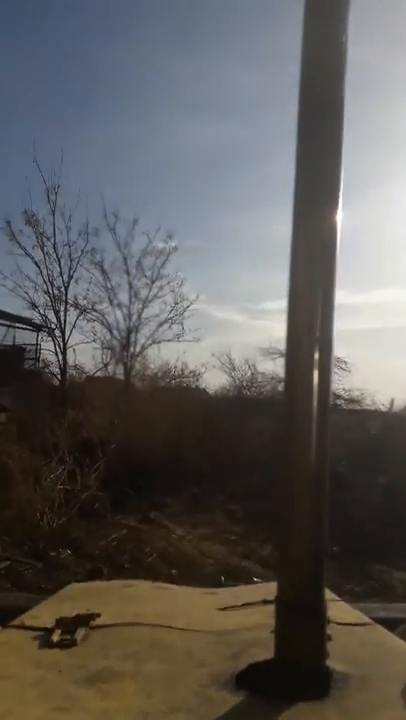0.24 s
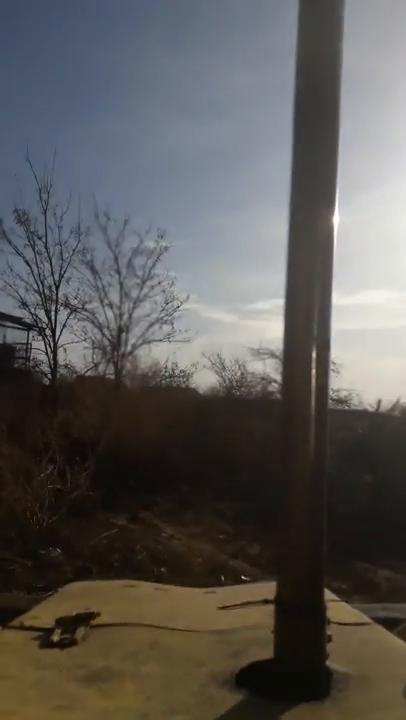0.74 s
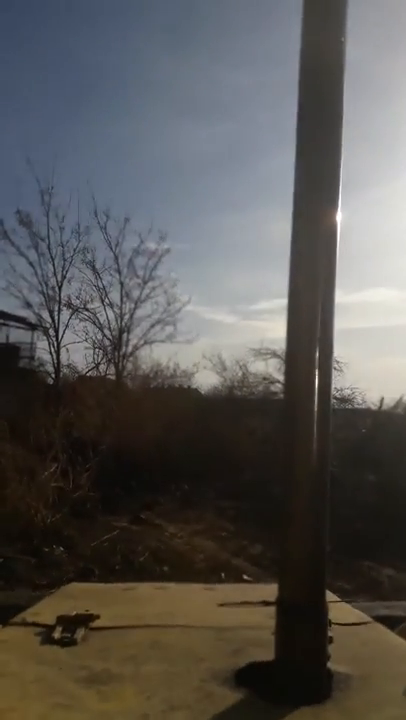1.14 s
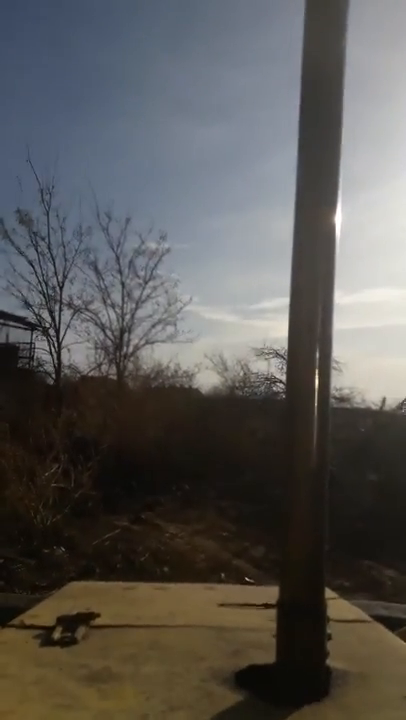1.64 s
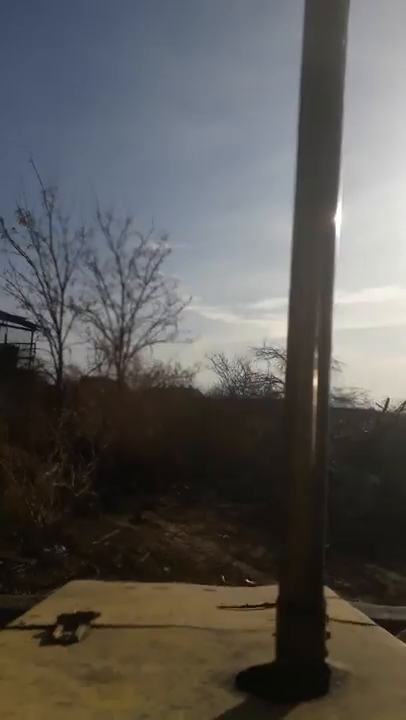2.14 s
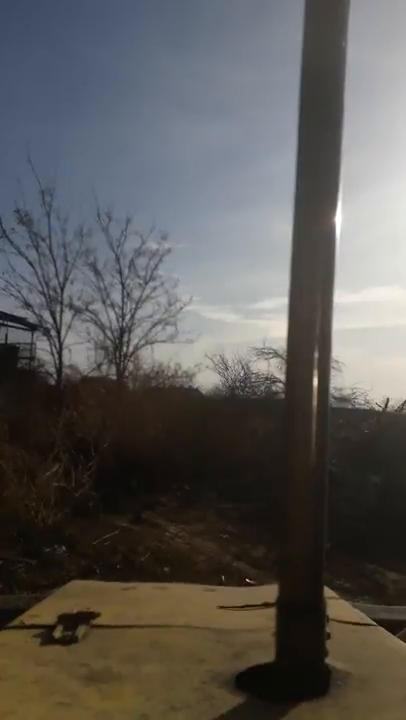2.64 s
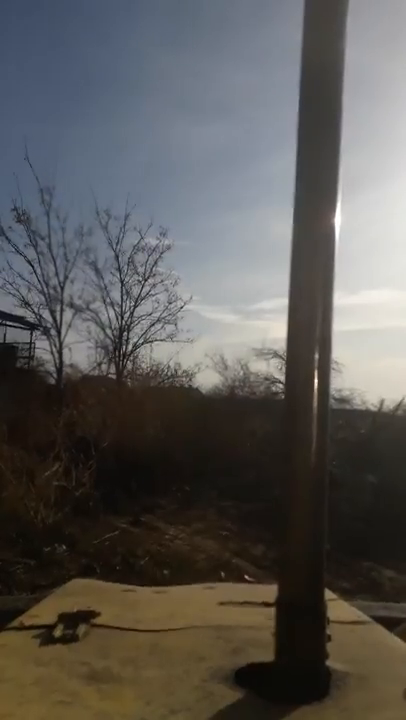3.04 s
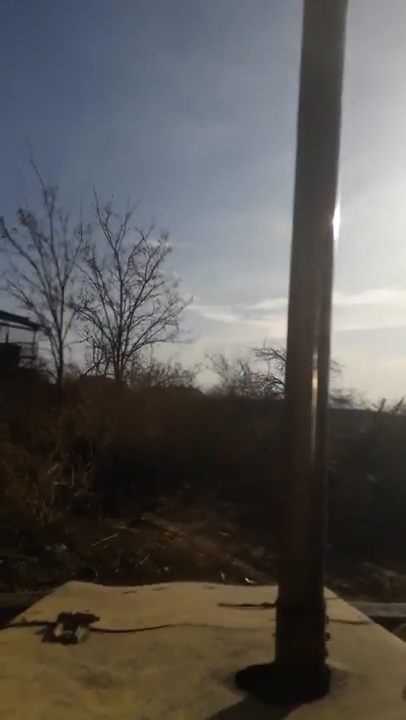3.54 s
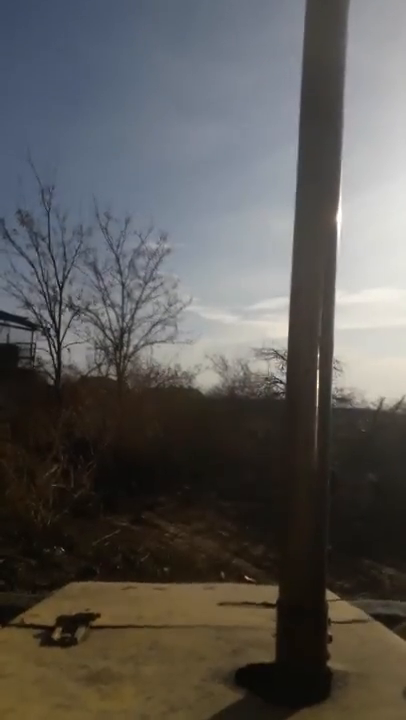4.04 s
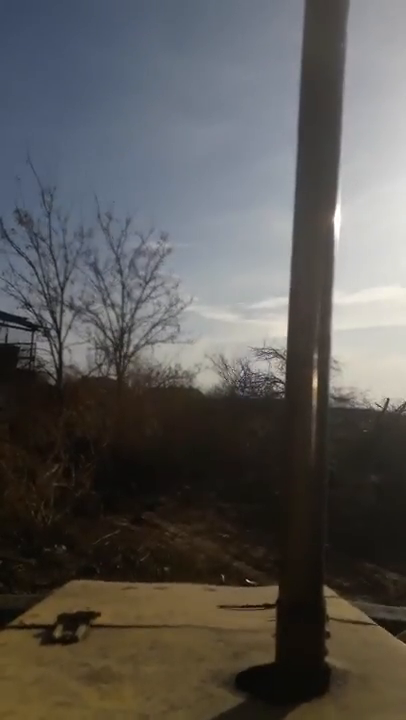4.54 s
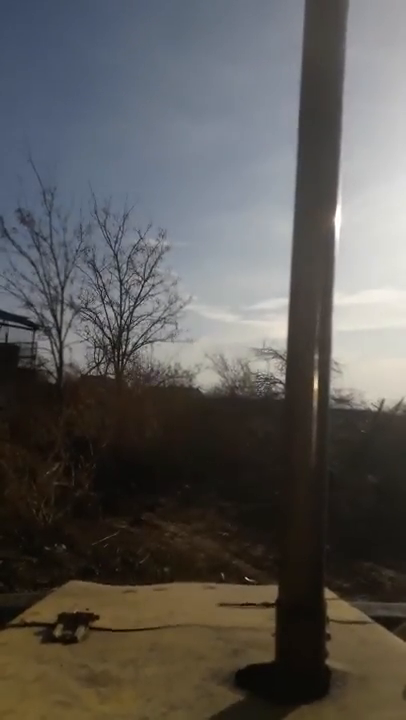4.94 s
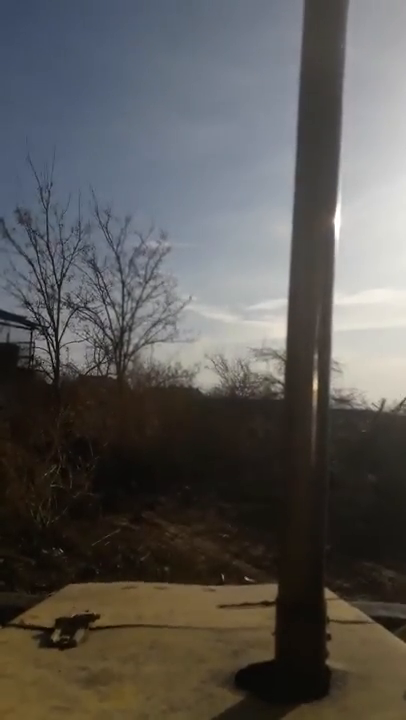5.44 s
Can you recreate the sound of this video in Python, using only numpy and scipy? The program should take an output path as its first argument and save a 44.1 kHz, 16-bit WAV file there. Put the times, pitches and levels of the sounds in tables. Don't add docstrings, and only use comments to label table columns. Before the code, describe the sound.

A four-cylinder diesel idles throughout, heard on a phone in the cab: a low boom and stack hum pulsing about 24 firings a second, with a six-per-second lope, muffled gas roar, faint fan and pump whine, and rattling metal parts. Effort rises slightly over the first seconds, with small panel shudders and a barely audible tick at 1.2 s. At 2.84 s a sharp double metal knock lands close to the microphone. From 3.07 to 3.25 s a latch slams in a rapid cluster of bright cracks, heavy low thuds and short spring rings, shaking loose parts. The engine immediately ducks and sinks, its hood boom reduced as the cab closes. Faint metal touches come at 3.86 to 3.98 s. From 4.25 to 4.6 s the level recovers; the idle sags very slightly lower. One clear, dry knock sounds at 5.22 s, and the engine continues to the end at about 5.7 s.

```python
import sys
import numpy as np
from scipy import signal
from scipy.fft import rfft, irfft
from scipy.io import wavfile
from scipy.ndimage import uniform_filter1d

SR = 44100
rng = np.random.default_rng(int(sys.argv[2]) if len(sys.argv) > 2 else 0)


def invert_db(level):
    return 10 ** (np.asarray(level, dtype=float) / 20)


def bounce(signal):
    frames = np.transpose(np.atleast_2d(signal))
    limited = np.clip(frames, -1, 1)
    pcm = np.round(limited * 32767).astype(np.int16)
    wavfile.write(sys.argv[1], SR, pcm)


N = 250488
TIME = np.arange(N) / SR

CYCLE_HZ = 71.9 / 12
# (time [s], crank lead over a steady idle [degrees of cycle])
GOVERNOR_HUNT = [
    (0, -1.5),
    (.75, 2.5),
    (2.25, -7),
    (3.25, -7),
    (3.75, -12),
    (4.75, -32),
    (5.68, -41),
]
# (time [s], level [dB])
EFFORT = [
    (0, -24.5),
    (.6, -22.5),
    (1.0, -21.5),
    (1.65, -20.5),
    (2.2, -21.5),
    (2.85, -20),
    (4.0, -22),
    (5.68, -21),
]
HUM_DB, BOOM_DB, DRONE_DB = -24, 0.5, 1
# (multiple of cycle rate [1], level re boom and drone [dB])
FIRING_ORDERS = [(8, -22.5), (20, -20.5), (24, -11), (28, -11), (32, -11.5), (36, -11.5), (44, -11)]
# (multiple of cycle rate [1], width [Hz], level [dB])
WHINES = [(61.39, 4, -3.5), (45.26, 6.7, -10), (72.7, 17, -10.5), (162.5, 29, -21.5), (149, 20, -25)]
# (place in cycle [0-1], pitch [Hz], width [Hz], shortness [1], level [dB])
SHAKEN_PARTS = [(0.05, 241, 8, 13, -9), (0.78, 248, 10, 13, -10), (0.76, 522, 12, 5.9, -9),
                (.2, 525, 10, 4, -12.5), (0.61, 366, 12, 1.2, -12), (.8, 960, 75, 4, -22.5),
                (0.18, 900, 670, 2.6, -20.5), (0.04, 750, 39, 1.6, -19.5), (.9, 1190, 65, 1.3, -25.5),
                (1, 2300, 280, 30, -37.5), (.91, 3800, 1200, 36, -36), (0.9, 5260, 800, 12, -43),
                (0.04, 1000, 700, 2.9, -17), (.77, 990, 740, 8, -20)]
# (frequency [Hz], density [dB per Hz])
GAS_ROAR = [(15, -44.5), (24, -15), (33, -30), (45, -24), (82, -9), (142, -2), (254, -11.5), (315, -4),
            (364, -6), (411, -10.5), (523, -2), (650, -16.5), (980, -19.5), (1790, -29), (5180, -44),
            (7300, -50.5), (8000, -59.5), (10400, -99.5), (17600, -120)]

# (time [s], level [dB], t60 [s], thud level [dB])
LATCH_BLOWS = [(1.229, -50, .04, -18), (2.835, -21, 0.1, -11), (2.846, -26, .16, -11),
               (3.069, -16.5, .12, -9), (3.074, -16, 0.34, 11), (3.1, -25, 0.43, 17),
               (3.179, -26.5, 0.16, -18), (3.186, -14.5, 0.18, 3), (3.197, -16, 0.2, 8),
               (3.254, -22, 0.14, -7), (3.859, -41, 0.028, -22), (3.878, -40, 0.076, -26),
               (3.891, -43, 0.084, -28), (3.983, -45, .09, -27), (5.224, -29.5, 0.2, -22)]
# (frequency [Hz], density [dB per Hz])
METAL_CRACK = [(350, -36.5), (600, -6), (1210, -8), (2980, -16.5), (3330, -21), (4700, -19.5), (4970, -22),
               (6040, -23.5), (8000, -34), (10400, -66), (17600, -120)]
# (frequency [Hz], width [Hz], level [dB])
WALL_THUD = [(250, 60, 1.5), (342, 64, 1), (444.6, 63, -2.5), (584, 340, -3.5)]
# (time [s], pitch [Hz], level [dB], t60 [s])
SPRING_RINGS = [(.055, 7800, -50, .06), (.31, 4500, -44, .06), (1.23, 7400, -48, .06),
                (2.80, 3418, -47, .6), (2.84, 1965, -29, .26), (2.84, 2525, -37, .11),
                (2.845, 8253, -44, .2), (2.85, 7219, -56, .3), (3.08, 910, -21, .2),
                (3.074, 1294, -18, .15), (3.072, 4700, -23, .07), (3.09, 2340, -24, .1),
                (3.18, 5500, -30, .1), (3.192, 2000, -20, .08), (3.195, 3300, -23, .07),
                (3.19, 6200, -27, .05), (3.254, 1130, -24, .1), (3.27, 1650, -32, .3),
                (3.881, 2590, -44, .07), (3.885, 4800, -50, .08), (3.885, 7000, -54, .1),
                (3.986, 5900, -52, .1), (5.226, 3150, -25, .045)]
# (time [s], level [dB])
CATCH_TICKS = [
    (2.836, -61),
    (3.859, -63),
    (3.881, -68.5),
    (3.984, -62),
    (5.225, -62.5),
]
TICK_T60_S = 0.012

SLAM_S, SHUT_S = 3.078, 0.27
SHUT_BOOM_DB, SHUT_DRONE_DB = -5, 1.5
JOLT_DB, JOLT_RISE_S, JOLT_HOLD_S, JOLT_FADE_S = 11.5, 0.046, 0.14, 0.16

# (time of peak [s], pitch [Hz], length [s], level [dB])
SHUDDERS = [(.41, 190, 0.044, -17), (0.653, 245, 0.15, -23), (0.801, 245, 0.049, -15),
            (1.05, 185, 0.039, -17.5), (1.47, 245, 0.085, -18), (1.629, 260, 0.041, -14),
            (1.635, 416.2, 0.023, -11.5), (2.176, 250, 0.023, -17), (2.576, 328.7, 0.11, -20),
            (2.605, 703, 0.38, -28.5), (2.696, 360.7, 0.017, -9), (2.788, 680, 0.11, -26.5),
            (3.24, 70, 0.103, -27.5), (3.33, 364.3, .08, -21.5), (4.581, 235, 0.026, -11),
            (4.7, 79.8, .04, -17), (5.249, 232, 0.06, -14.5)]
PANEL_LOSS = 0.16

DUCK_DB, DUCK_FALL_S, CREEP_DB, CREEP_S = -7, 0.012, -5, 0.4
RELEASE_S, RECOVER_S = 4.246, 0.34
# (frequency [Hz], density [dB per Hz])
TOP_HISS = [(6000, -28.5), (8000, 0), (9300, -6.5), (11000, -0.5), (13000, -3), (15500, -4.5),
            (17000, -36.5)]


def evened(x):
    return x / np.sqrt(np.mean(x ** 2) + 1e-20)


def coloured(points, size):
    f, db = np.transpose(points)
    hz = np.fft.rfftfreq(size, 1 / SR)
    gain = invert_db(np.interp(np.log(hz + 1), np.log(f), db))
    return evened(irfft(rfft(rng.standard_normal(size)) * gain, size))


def fuzzy(hz, width, steady=0):
    r = np.exp(-np.pi * width / SR)
    noise = [1, 1j] @ rng.standard_normal((2, len(hz)))
    slow = signal.lfilter([1], np.convolve([1, -r], [1, -r]), noise)
    slow = slow / (abs(slow) + 1e-9) ** np.clip(steady, 0, 1)
    return evened((slow * np.exp(2j * np.pi * np.cumsum(hz) / SR)).real)


def band(x, lo_hz, hi_hz, order=4):
    return signal.sosfilt(signal.butter(order, [lo_hz, hi_hz], "band", fs=SR, output="sos"), x)


def bump(cycle, place, shortness):
    return np.exp(shortness * (np.cos(2 * np.pi * (cycle - place)) - 1))


def uneven(cycle, place, spread_db):
    draws = rng.standard_normal(40)
    return invert_db(spread_db * np.interp(cycle - place + 1, np.arange(40), draws))


def ramp(start, length):
    return np.clip((TIME - start) / length, 0, 1)


def stack(cycle, hum_db, boom_db, drone_db):
    hum = np.cos(2 * np.pi * 12 * cycle + np.radians(126))
    hum *= invert_db(hum_db) * uneven(cycle, 0.4, 0.61)

    peak = cycle - 0.03
    nearest = np.round(peak)
    ring = np.cos(2 * np.pi * (nearest * 16 + 16.9 * (peak - nearest)) + 2.65)
    boom = (0.13 + bump(peak, 0, 1.2)) * ring + 0.41 * np.cos(2 * np.pi * 16 * peak + 3.1)
    boom = invert_db(boom_db) * uneven(cycle, 0.03, 0.23) * evened(boom)

    pulses = np.zeros(N)
    for order, db in FIRING_ORDERS:
        pulses += invert_db(db) * uneven(cycle, 0, 1.0) * np.cos(2 * np.pi * order * (cycle + 0.0042))
    pulses *= invert_db(0.43 * boom_db + 0.51 * drone_db)
    return np.sqrt(2) * (hum + pulses) + boom


def clatter(cycle, boom_db, drone_db):
    speed = np.gradient(cycle) * SR
    out = np.zeros(N)
    for order, width, db in WHINES:
        out += invert_db(db) * fuzzy(order * speed, width, steady=0.85)
    out += invert_db(boom_db - 5.0) * fuzzy(31.3 * speed, 4.9, steady=0.94)
    out += invert_db(2.5 * drone_db - 8.5) * fuzzy(40 * speed, 2, steady=1)
    for place, hz, width, shortness, db in SHAKEN_PARTS:
        shake = evened(bump(cycle, place, shortness) * uneven(cycle, place, 1.5))
        cab = invert_db(drone_db) if hz < 300 else 1
        tone = fuzzy(np.full(N, hz), width, steady=0.9 if hz < 700 else 0.15)
        out += cab * invert_db(db) * shake * tone
    puff_db = 3.1 * bump(4 * cycle, 0.88, 0.91) + 1.3 * bump(cycle, 0.99, 0.4)
    puffs = invert_db(puff_db) * uneven(4 * cycle % 38, 0, 0.98)
    return out + invert_db(0.5) * evened(puffs) * coloured(GAS_ROAR, N)


def metal_crack(t, t60):
    rattle = invert_db(2.2 * evened(uniform_filter1d(rng.standard_normal(len(t)), 100)))
    crack = coloured(METAL_CRACK, len(t)) * rattle * invert_db(-60 * t / t60)
    dull = signal.lfilter([0.2], [1, -0.8], crack)
    crack = dull + (crack - dull) * (0.45 + 1.73 * invert_db(-60 * t / 0.14))
    for share, size, length in rng.random((8, 3)):
        hz = 900 * 7 ** share
        ring_t60 = t60 * (0.5 + length) * (1 - 0.35 * share)
        ring_db = -1.0 - 17 * share - 8.9 * size - 60 * t / ring_t60
        crack += invert_db(ring_db) * fuzzy(np.full(len(t), hz), 160)
    return crack * (1 - np.exp(-t / 0.0016))


def wall_thud(t, thud_db):
    thud = sum(invert_db(db) * fuzzy(np.full(len(t), hz), width) for hz, width, db in WALL_THUD)
    return thud * invert_db(thud_db - 2.0 - 60 * t / 0.27) * (1 - np.exp(-(t / 0.015) ** 2))


def latch():
    out, t = np.zeros(N + SR), TIME[:SR // 3]
    for s, db, t60, thud_db in LATCH_BLOWS:
        at = round(s * SR)
        out[at:at + len(t)] += invert_db(db) * (metal_crack(t, t60) + wall_thud(t, thud_db))
    for s, hz, db, t60 in SPRING_RINGS:
        at = round(s * SR)
        swell = invert_db(db + 1.0 - 60 * t / t60) * (1 - np.exp(-t / 0.0011))
        out[at:at + len(t)] += swell * fuzzy(np.full(len(t), hz), 18, steady=1.0)
    return out[:N]


def ticks():
    out = np.zeros(N)
    for s, db in CATCH_TICKS:
        since = np.where(TIME < s, 9, TIME - s)
        out += invert_db(db - 60 * since / TICK_T60_S)
    return out


def shudders():
    out, t = np.zeros(N), TIME[:SR // 2]
    for s, hz, length, db in SHUDDERS:
        at = round((s - 0.25) * SR)
        swell = np.exp(-((t - 0.25) / (length / 2)) ** 2)
        panel = invert_db(db) * swell * fuzzy(np.full(len(t), hz), PANEL_LOSS * hz, steady=0.8)
        out[at:at + len(t)] += panel[:N - at]
    return out


def ducking():
    sink = 1 - np.exp(-np.maximum(TIME - SLAM_S, 0) / CREEP_S)
    return (DUCK_DB * ramp(SLAM_S, DUCK_FALL_S) + CREEP_DB * sink) * (1 - ramp(RELEASE_S, RECOVER_S))


def scene():
    lead = uniform_filter1d(np.interp(TIME, *np.transpose(GOVERNOR_HUNT)), size=8000)
    cycle = CYCLE_HZ * TIME + lead / 360
    effort_db = np.interp(TIME, *np.transpose(EFFORT))
    shut = ramp(SLAM_S, SHUT_S)
    jolt_end = SLAM_S + JOLT_RISE_S + JOLT_HOLD_S
    jolt_db = JOLT_DB * (ramp(SLAM_S, JOLT_RISE_S) - ramp(jolt_end, JOLT_FADE_S))
    boom_db = BOOM_DB + SHUT_BOOM_DB * shut
    drone_db = DRONE_DB + SHUT_DRONE_DB * shut
    engine = stack(cycle, HUM_DB - effort_db, boom_db + 0.62 * jolt_db, drone_db)
    engine += invert_db(jolt_db) * clatter(cycle, boom_db, drone_db)
    return (invert_db(effort_db + ducking()) * engine + shudders() + latch())[None]


def low_pass(x):
    return signal.sosfilt(signal.butter(12, 15762, fs=SR, output="sos"), x)


def record(dry):
    squeezed = np.sign(dry) * (0.7 + 0.25 * np.tanh((abs(dry) - 0.7) / 0.25))
    limited = np.where(abs(dry) < 0.7, dry, squeezed)
    kept = signal.sosfilt(signal.butter(8, 7600, fs=SR, output="sos"), limited)
    treble_power = uniform_filter1d(band(kept, 5740, 7500) ** 2, 120)
    treble_db = 10 * np.log10(abs(treble_power) + 1e-12)
    usual_db = uniform_filter1d(treble_db, size=12000)
    treble_db = np.maximum(treble_db - 3.0, usual_db)
    hiss_level = invert_db(-81.0 + 1.14 * (treble_db + 61.5)) + invert_db(-88.5) + ticks()
    hiss = hiss_level * coloured(TOP_HISS, N)
    hiss = signal.sosfilt(signal.butter(8, 7600, "high", fs=SR, output="sos"), hiss)
    return low_pass(kept + hiss)


dry = scene()
out = record(dry)
bounce(out)
```